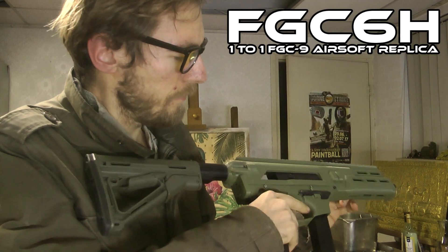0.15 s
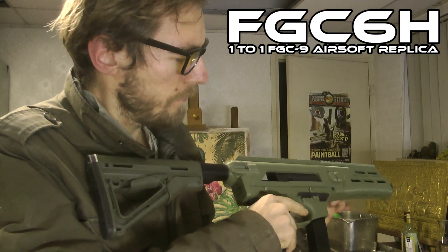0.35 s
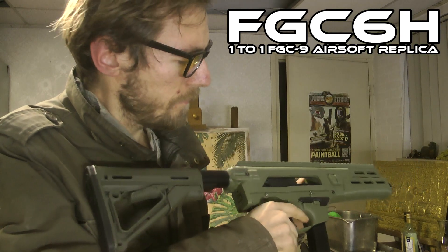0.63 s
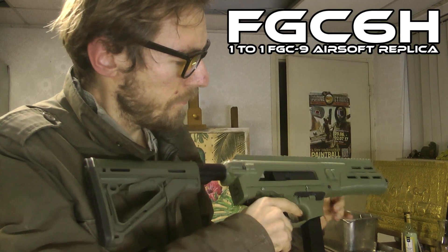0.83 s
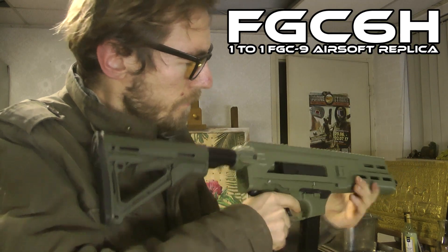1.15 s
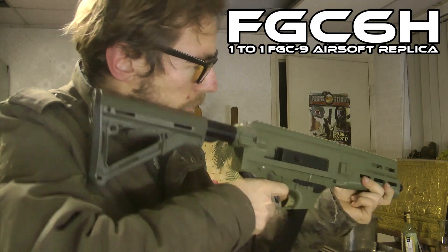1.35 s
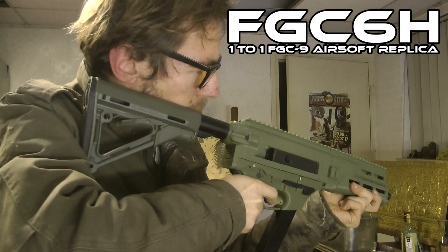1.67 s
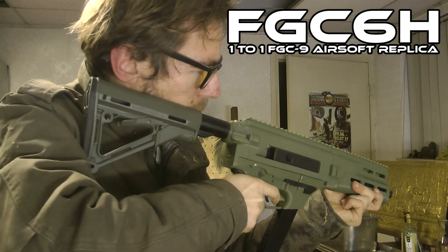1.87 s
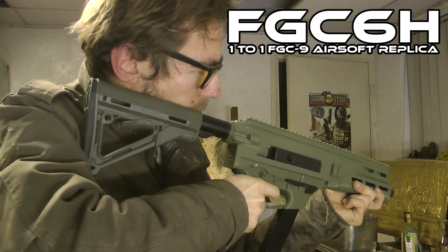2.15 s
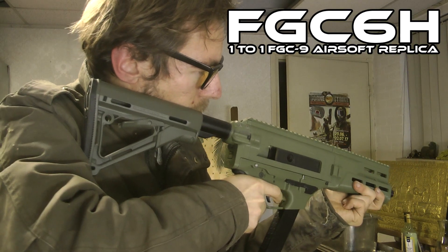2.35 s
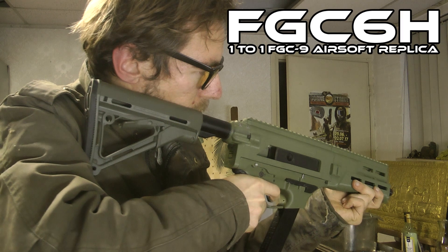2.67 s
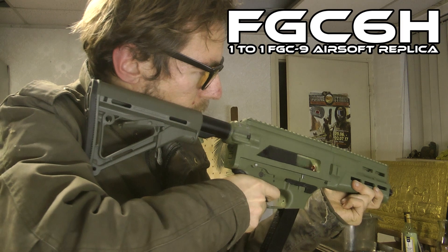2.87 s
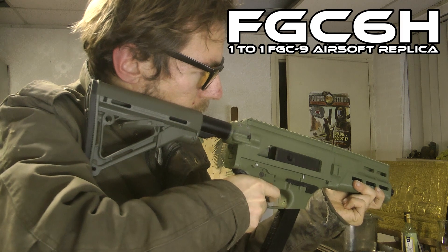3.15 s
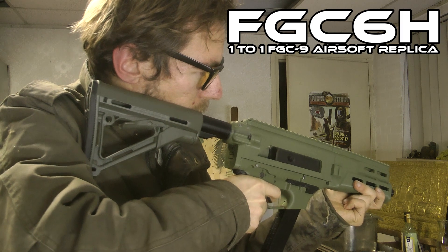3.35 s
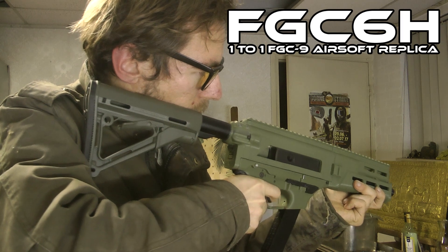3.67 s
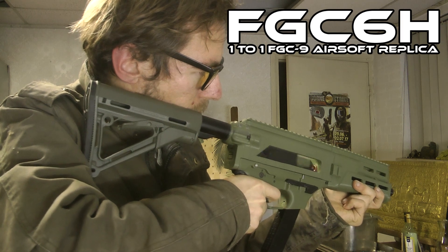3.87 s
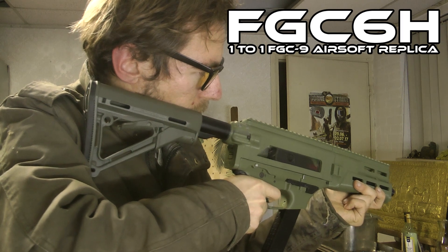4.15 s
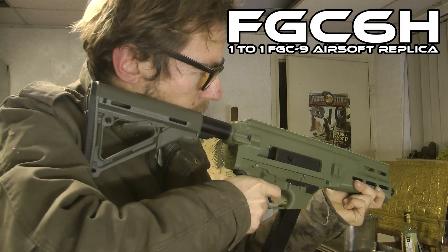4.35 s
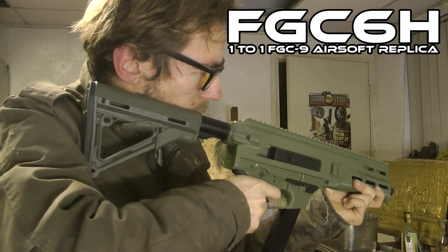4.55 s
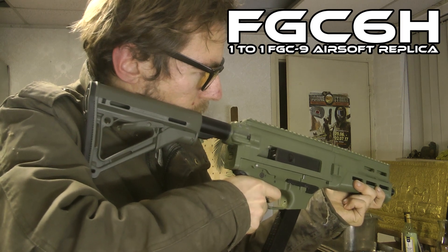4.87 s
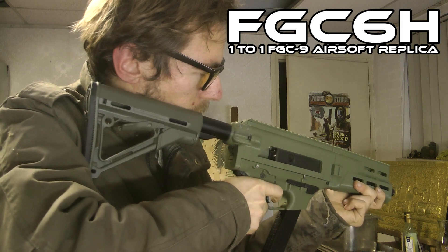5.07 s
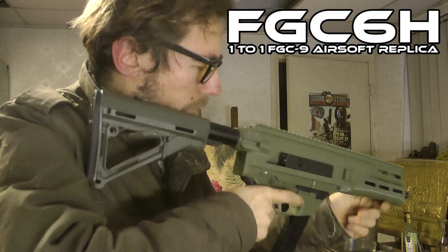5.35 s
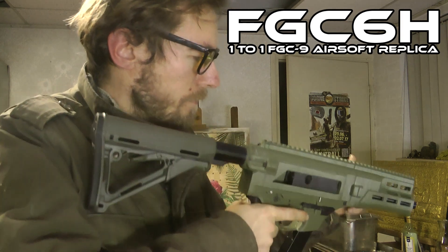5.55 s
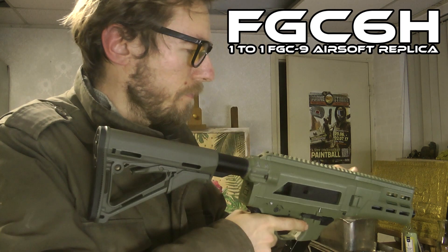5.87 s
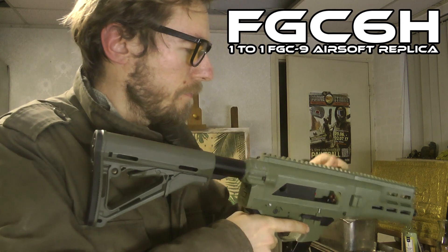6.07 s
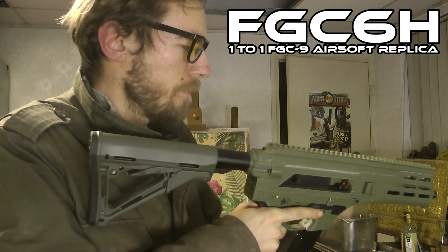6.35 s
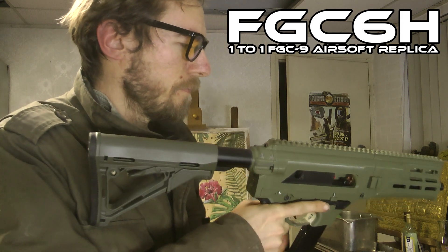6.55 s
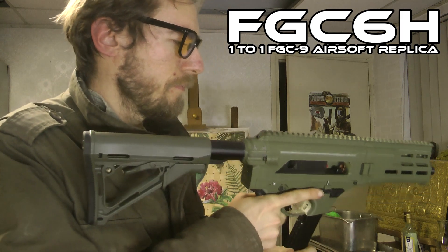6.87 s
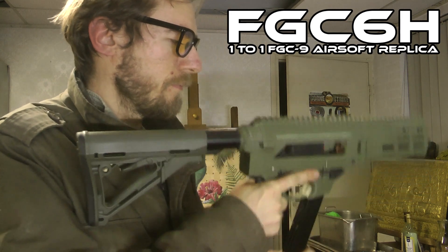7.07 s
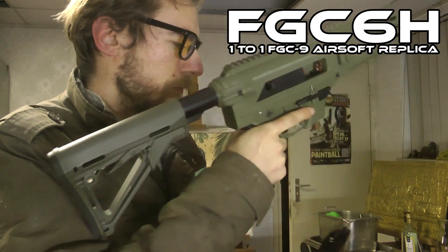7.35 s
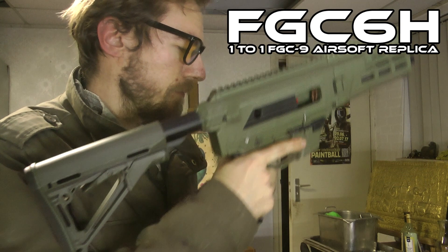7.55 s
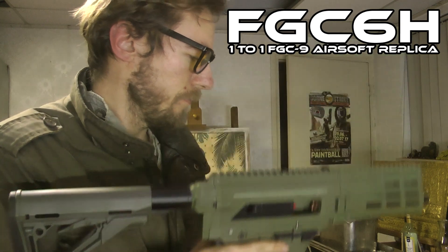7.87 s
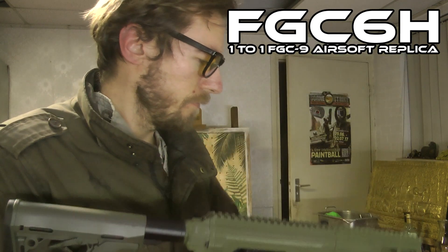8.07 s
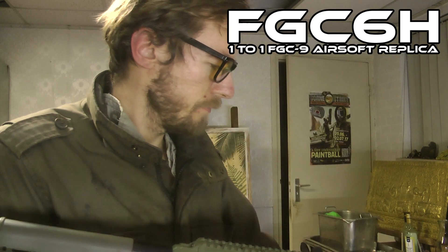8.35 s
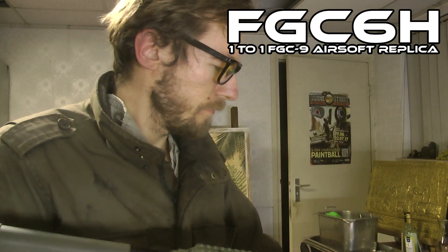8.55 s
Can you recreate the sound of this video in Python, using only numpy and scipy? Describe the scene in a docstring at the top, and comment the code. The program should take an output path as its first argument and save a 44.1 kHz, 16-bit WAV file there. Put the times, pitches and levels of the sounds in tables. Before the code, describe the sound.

Gas airsoft gun is cocked with metallic clacks, fires eight sharp shots and a weak ninth, then is racked and its magazine thuds down.

```python
"""Gas blowback airsoft gun in a small room

Loaded and cocked close to the microphones, it fires eight shots and a weak ninth; then the bolt is racked
and the magazine comes out and lands with a thud. A jacket rustles over room air and a faint hum.
Contacts are noise bursts and friction is gated noise, coloured by the parts that carry them; a convolved
tail adds the room, slow pulses the low thumps at hard blows, and decaying sines the spring.
"""
import sys
import numpy as np
from scipy import signal
from scipy.fft import rfft, irfft, next_fast_len
from scipy.io import wavfile
from scipy.ndimage import uniform_filter1d

SR = 44100
rng = np.random.default_rng(int(sys.argv[2]) if len(sys.argv) > 2 else 0)


def wav_out(sig):
    """Save sig, one row per channel (or a flat mono array), as 16-bit PCM at SR to the path in sys.argv[1]."""
    wavfile.write(sys.argv[1], SR, np.round(np.clip(np.atleast_2d(sig).T, -1, 1) * 32767).astype(np.int16))


N = 384728
TIME = np.arange(N) / SR
MIRROR = np.array([[1], [-1]])   # left, right signs of a side signal

# All levels are relative: later gains, colours and the gain control act on them.


def from_db(db):
    """Amplitude ratio of a level in dB."""
    return 10 ** (np.asarray(db) / 20)


def rms_one(x):
    """Scale to unit rms."""
    return x / np.sqrt(np.mean(x ** 2) + 1e-20)


def at_hz(points, hz):
    """Interpolate (freq_hz, value) points on a log-frequency axis."""
    freq_hz, value = np.transpose(points)
    return np.interp(np.log(np.maximum(hz, 1)), np.log(freq_hz), value)


def convolve(x, response):
    """Convolve and trim to the scene length."""
    return signal.oaconvolve(x, response)[:N]


def body(x, colour, resonances=(), size=8192):
    """A solid part filters x: minimum-phase response of unit energy, broad colour plus resonances."""
    hz = np.arange(size // 2 + 1) * SR / size
    db = at_hz(colour, hz)
    for freq_hz, width_hz, lift_db in resonances:
        db = db + lift_db / (1 + (2 * (hz - freq_hz) / width_hz) ** 2)
    # folded cepstrum gives minimum phase
    cepstrum = irfft(np.log(from_db(db)))[:size // 2]
    cepstrum[1:] *= 2
    response = irfft(np.exp(rfft(cepstrum, size)))
    return convolve(x, response / np.linalg.norm(response))


def contacts(rows, t60_s, gain_db, hold_s=0., delay_s=0., rise_s=0.00017, size=4096):
    """Each contact is a burst of micro-impacts that builds up, holds and dies away."""
    age_s = np.arange(size) / SR
    out = np.zeros(N + 2 * size)
    decay = from_db(-60 * np.maximum(age_s - hold_s, 0) / t60_s)
    shape = np.minimum(age_s / rise_s, 1) * decay
    hz = np.arange(size // 2 + 1) * SR / size
    octaves = np.log2(np.maximum(hz, 1400) / 3500)   # brightness is flat below 1400 Hz
    noises = rng.laplace(size=(len(rows), size))
    for (start_s, level_db, bright_db_per_oct), noise in zip(rows, noises):
        # a short blow excites all pitches alike: keep phase only
        even = np.exp(1j * np.angle(rfft(noise * shape)))
        burst = irfft(even * from_db(bright_db_per_oct * octaves))
        burst = burst * np.minimum(2 * shape, 1) ** .5
        at = int((start_s + delay_s) * SR)
        out[at:at + size] += from_db(level_db + gain_db) * np.linalg.norm(shape) * burst
    return out[:N]


def strokes(rows, release_s):
    """Gain of strokes that swell, hold and die away; attack and release each span 20 dB."""
    db = -120
    for start_s, length_s, level_db, attack_s in rows:
        before = np.maximum(start_s - TIME, 0) / attack_s
        after = np.maximum(TIME - start_s - length_s, 0) / release_s
        db = np.maximum(db, level_db - 20 * (before + after))
    return from_db(db)


def friction(grain_db, grains_per_s, uneven_db=2.5, strokes_per_s=35):
    """Noise whose strength wanders as tiny contacts catch and let go under an uneven pressure."""
    db = 0
    for depth_db, rate in ((grain_db, grains_per_s), (uneven_db, strokes_per_s)):
        db = db + depth_db * np.interp(TIME * rate, np.arange(N), rng.standard_normal(N))
    return rms_one(rng.standard_normal(N) * from_db(db))


def diffuse(length, count=3, size=3072):
    """Rows of well-scattered reflections: noise in which no single pitch stands out."""
    noise = rng.standard_normal((count, length))
    for _ in range(2):
        frames = signal.stft(noise, nperseg=size)[2]
        flat = np.exp(1j * np.angle(frames))
        noise = signal.istft(flat, nperseg=size)[1][:, :length]
    return noise


# room decay: freq_hz, t60_s
ROOM_DECAY = [(100, .22), (500, 0.31), (1400, 0.22), (3700, 0.33), (9700, 0.25), (16000, 0.21)]
# strength of reflections: freq_hz, level_db
REFLECTION_COLOUR = [(100, -5.5), (500, 1), (1200, 1), (3000, 0), (7000, 3), (16000, -0.5)]


def room(x, wet_db, spread_db=-10, build_up_s=0.0032, sway_rad_per_s=4.52, count=7):
    """Direct sound and a dense tail that dies band by band; close microphones hear nearly the same."""
    age_s = TIME[:SR // 2]
    hz = np.arange(len(age_s) // 2 + 1) * SR / len(age_s)
    centres_hz = np.geomspace(150, 15000, count)
    white = rfft(diffuse(len(age_s)))
    tail = 0
    for centre_hz, share in zip(centres_hz, np.eye(count)):
        band = irfft(white * at_hz(np.c_[centres_hz, share], hz), len(age_s))
        decay_db = -60 * age_s / at_hz(ROOM_DECAY, centre_hz)
        tail = tail + band * from_db(at_hz(REFLECTION_COLOUR, centre_hz) + decay_db)
    tail = tail * (1 - np.exp(-(age_s / build_up_s) ** 2))   # reflections take a moment to arrive
    here, there, across = from_db(wet_db) * tail / np.linalg.norm(tail, axis=1, keepdims=True)
    # as the gun sways, the pattern of reflections changes
    sway = sway_rad_per_s * TIME
    mid = convolve(x * np.cos(sway), here) + convolve(x * np.sin(sway), there)
    return x + mid + from_db(spread_db) * convolve(x, across) * MIRROR


# room air: freq_hz, level_db
AIR_SPECTRUM = [(15, -37.5), (25, -16), (263, -11.5), (301, -7), (354, -15.5), (394, -9.5), (624, -23.5),
                (775, -12), (863, -26), (1610, -22), (1740, -14.5), (2110, -19), (8830, -33),
                (14000, -32.5), (16000, -31)]
# room air, side against mid: freq_hz, level_db
AIR_SIDE = [(60, -6.5), (550, -7), (1650, -11.5), (5000, -34.5), (15000, -19)]
AIR_LEVEL_DB = -55.5


def room_air():
    """Steady coloured noise, its two channels less alike at low pitches."""
    mid, side = [from_db(AIR_LEVEL_DB) * body(rng.standard_normal(N), AIR_SPECTRUM) for _ in range(2)]
    size = next_fast_len(N)
    hz = np.arange(size // 2 + 1) * SR / size
    side = irfft(rfft(side, size) * from_db(at_hz(AIR_SIDE, hz)), size)[:N]
    return mid + side * MIRROR


# appliance hum: freq_hz, rms_level_db
HUM_TONES = [(299.6, -62), (762, -71.5)]


def appliance_hum():
    """Steady sines of an appliance in the room."""
    return sum(np.sqrt(2) * from_db(rms_level_db) * np.sin(2 * np.pi * freq_hz * TIME)
               for freq_hz, rms_level_db in HUM_TONES)


# arm moving in its sleeve: start_s, length_s, level_db, attack_s
SLEEVE_MOVES = [(.08, 0.14, -52, .2), (1.32, .17, -40.5, 0.36), (5.4, 0.15, -56.5, 0.24),
                (5.73, 0.04, -52.5, 0.47), (6.56, 0.016, -50.5, .12), (7.88, 0.6, -51, 0.62),
                (8.12, 0.017, -46.5, .06)]
# jacket cloth: freq_hz, level_db
CLOTH_SPECTRUM = [(180, -16.5), (300, -4.5), (354, -6), (398, -10.5), (645, -8), (713, -12), (994, -15.5),
                  (2880, -7), (5080, -10.5), (14500, -25.5), (16000, -36)]
SLEEVE_RELEASE_S = 0.2


def jacket():
    """Cloth rubs on cloth as the arms move: grainy friction noise under slow strokes."""
    rub = strokes(SLEEVE_MOVES, SLEEVE_RELEASE_S) * friction(grain_db=1.0, grains_per_s=220)
    return room(body(rub, CLOTH_SPECTRUM), wet_db=-12.5)


# magazine landings: start_s, level_db
MAGAZINE_LANDINGS = [(8.412, -15.5), (8.635, -36)]
ROCK_S, ROCK_LOSS_DB, LANDING_DB_PER_OCT = .017, 4, -3   # time and loss per touch, brightness


def rocking(count=6):
    """Each landing rocks: a run of ever weaker touches, slightly uneven in time."""
    return [(start_s + ROCK_S * k * rng.uniform(0.88, 1.05), level_db - ROCK_LOSS_DB * k, LANDING_DB_PER_OCT)
            for start_s, level_db in MAGAZINE_LANDINGS for k in range(count)]


# thud: freq_hz, level_db
THUD_SPECTRUM = [(24, -69), (40, -27), (129, -4.5), (351, 0.5), (435, -3.5), (527, -12), (771, -15),
                 (956, -29), (1080, -17), (1190, -30), (1740, -25), (3310, -23.5), (12000, -58),
                 (15600, -85), (22000, -120)]
# hollow ring of the table: freq_hz, width_hz, lift_db
TABLE_MODES = [(226, 22, 1), (274, 30, 1.5), (345, 110, 0), (432, 31, 5.5), (760, 150, 6)]


def landing_thud():
    """The rocking magazine strikes the hollow table, whose low resonances ring."""
    touches = contacts(rocking(), t60_s=0.04, gain_db=0.5)
    return room(body(touches, THUD_SPECTRUM, TABLE_MODES), wet_db=-6.5, spread_db=-6)


# spring zings: start_s, level_db, bright_db_per_oct
SPRING_ZINGS = [(0.893, -13.5, -3.5), (2.478, -26.5, 3.5), (5.119, -27.5, 11), (5.123, -16.5, -3.5),
                (7.778, -39.5, 0.5)]
# scrape of the coils: freq_hz, level_db
ZING_SPECTRUM = [(880, -85), (1500, -43.5), (1670, -20), (1900, -61.5), (2100, -19), (3520, -0.5),
                 (3810, 3.5), (5280, 6), (5710, 3), (11200, -0.5), (16000, -2.5)]
# recoil spring modes: freq_hz, level_db, t60_s
SPRING_MODES = [(3760, -6.5, 0.66), (3700, 1.5, 0.72), (4270, -6.5, 0.54), (4770, 0, .5), (4900, -8, 0.77),
                (4900, -2, 0.46), (5600, -5, 0.38), (6040, -0.5, .4), (6240, -3.5, 0.8),
                (6700, -10.5, 0.44), (10300, -10.5, .25), (11100, -12, .25)]


def spring():
    """A bright scrape of the coils, which then ring on as decaying sines."""
    scrape = contacts(SPRING_ZINGS, t60_s=0.055, gain_db=-3, rise_s=.001)
    age_s = TIME[:SR]
    ring = sum(from_db(level_db - 60 * age_s / t60_s) * np.sin(2 * np.pi * freq_hz * age_s)
               for freq_hz, level_db, t60_s in SPRING_MODES)
    ringing = from_db(-10) * convolve(scrape, ring / np.linalg.norm(ring))
    return ringing + room(body(scrape, ZING_SPECTRUM), wet_db=-2)


# small ticks: level over the arm movement, its spread, brightness
RATTLE_DB, RATTLE_SPREAD_DB, RATTLE_DB_PER_OCT = 6.5, 3, -6.5


def rattles(count=70):
    """Loose fittings tick at random moments, as strongly as the arms are moving."""
    movement_db = 20 * np.log10(strokes(SLEEVE_MOVES, SLEEVE_RELEASE_S))
    moments = rng.integers(0, N, count)
    chances = rng.standard_normal(count)
    return [(at / SR, movement_db[at] + RATTLE_DB + RATTLE_SPREAD_DB * chance, RATTLE_DB_PER_OCT)
            for at, chance in zip(moments, chances)]


# ringing metal catches: start_s, level_db, bright_db_per_oct
CATCH_HITS = [(0.4703, -6.5, 1.5), (0.4765, -15, -2), (0.8422, -8.5, -2), (0.8935, -6, 3.5),
              (5.9592, -2, 1.5)]
# hand-worked parts hit their stops: start_s, level_db, bright_db_per_oct
CLACK_HITS = [(0.5500, -1, -1.5), (0.5575, 4, 1.5), (0.5685, 7, -6), (0.5845, -1, 2), (0.5930, 7.5, 0),
              (0.8690, 0.5, 0), (0.8920, 4.5, 1.5), (6.0140, 4.5, 2.5), (6.0435, 5, -1), (6.0560, -4, 6),
              (6.0630, 4, -2)]
# knocks of magazine and grip, dull to bright: start_s, level_db, bright_db_per_oct
KNOCK_HITS = [(0.438, -33.5, -8.5), (0.464, -21, -4), (0.828, -12.5, -8), (1.495, -21, 1.5),
              (1.562, -27.5, -3.5), (3.760, -6.5, 9.5), (4.728, -22, -5.5), (5.931, -29.5, -7),
              (6.185, -8, -3.5), (6.249, 1, -0.5), (6.539, -32.5, -1.5), (6.780, -38.5, -8),
              (7.081, -21, -0.5), (7.132, -26, 6), (7.153, -23, -5.5), (7.358, -21.5, -3.5),
              (7.374, -25.5, -1), (8.411, -22, -1)]
# metal slides on metal: start_s, length_s, level_db, attack_s
SLIDE_STROKES = [(.505, 0.033, -26, 0.009), (.565, 0.031, -21, .015), (.86, 0.026, -24, 0.051),
                 (6.01, 0.057, -23.5, 0.014), (6.178, .005, -41, 0.025), (6.243, 0.0057, -28.5, 0.014),
                 (7.165, 0.028, -43.5, .03), (7.22, 0.14, -60.5, .02)]
# charging rod squeals as it is drawn: start_s, length_s, level_db, attack_s
SQUEAL_STROKES = [(.516, 0.031, -25.5, 0.0055), (.86, .02, -40, .007)]
# spectra: freq_hz, level_db
CATCH_SPECTRUM = [(40, -29), (400, -20.5), (1000, -23), (1800, -4.5), (3800, -2), (5800, -8), (7000, -13.5),
                  (11000, -18.5), (16000, -32)]
CLACK_SPECTRUM = [(35, -27.5), (60, -15.5), (164, -25), (492, -26), (946, -50), (1410, -3.5), (1550, -24.5),
                  (1740, -1.5), (3190, -3.5), (3500, -1.5), (7060, -5.5), (14200, -14.5), (16000, -20.5)]
KNOCK_SPECTRUM = [(71, -77), (120, -33), (362, -12.5), (1070, -14.5), (1290, -10.5), (2340, -4),
                  (3820, -7.5), (4230, -1.5), (5190, -7.5), (6500, -12), (12000, -28.5), (14700, -31.5),
                  (16000, -38)]
SLIDE_SPECTRUM = [(120, -77.5), (200, -22), (548, -19.5), (777, -11.5), (1230, -11), (1740, -6.5),
                  (2960, -3), (3690, -7.5), (4350, -4.5), (9060, -15), (16000, -23)]
SQUEAL_SPECTRUM = [(300, -24.5), (800, -1.5), (3800, 4), (9000, -19.5)]
# resonances of steel, magazine, trigger lever and rod: freq_hz, width_hz, lift_db
STEEL_MODES = [(813, 170, 21), (1174, 76, 8), (1670, 83, 8), (1870, 110, 3), (2680, 110, 6.5),
               (3640, 200, 5.5), (4200, 85, 11), (4940, 150, 6.5), (5820, 330, 9.5)]
MAGAZINE_MODES = [(416, 21, 10), (798, 74, 5.5), (950, 160, -7.5), (1078, 62, 9.5), (1710, 56, 7),
                  (1977, 63, 1.5), (2444, 34, -2.5), (2580, 99, 2.5)]
LEVER_MODES = [(2050, 750, 6.5), (3730, 200, 2.3), (5970, 770, 2.55)]
ROD_MODES = [(818, 68, 26.5), (3830, 250, 23)]
SLIDE_RELEASE_S, SQUEAL_RELEASE_S = 0.029, .005


def handling():
    """Catches ring, parts slide, squeal and clack into place, magazine and grip knock."""
    catches = contacts(CATCH_HITS, t60_s=0.029, gain_db=2.5, hold_s=0.0019)
    catches = body(catches, CATCH_SPECTRUM, STEEL_MODES)
    clacks = body(contacts(CLACK_HITS, t60_s=0.018, gain_db=-3), CLACK_SPECTRUM, MAGAZINE_MODES)
    knocks = contacts(KNOCK_HITS + rattles(), t60_s=0.034, gain_db=-7, rise_s=0.00063)
    knocks = body(knocks, KNOCK_SPECTRUM, MAGAZINE_MODES + LEVER_MODES)
    rub = strokes(SLIDE_STROKES, SLIDE_RELEASE_S) * friction(grain_db=1.5, grains_per_s=790)
    slide = body(from_db(9.0) * rub, SLIDE_SPECTRUM, MAGAZINE_MODES)
    draw = strokes(SQUEAL_STROKES, SQUEAL_RELEASE_S) * rng.standard_normal(N)
    squeal = body(from_db(3.5) * draw, SQUEAL_SPECTRUM, ROD_MODES)
    return room(catches + knocks + squeal, wet_db=-3.5) + room(clacks + slide, wet_db=-4.5)


# valve opens, weaker as the gas cools: start_s, strength_db, trigger_lead_s, bolt_travel_s, thump_db
SHOT_CYCLES = [(2.0896, 0, 0.035, 0.074, -13.5), (2.6039, 0, .0339, 0.071, -22.5),
               (2.9597, -2, .0334, 0.07, -25), (3.309, -3, 0.037, 0.07, -16.5),
               (3.6314, -3.5, 0.045, 0.072, -24.5), (3.9632, -3, 0.034, 0.071, -21.5),
               (4.2715, -3.5, .0334, .0717, -25), (4.5809, -4.5, 0.033, 0.068, -28)]
# low thumps at other hard blows: start_s, level_db
OTHER_THUMPS = [(0.894, -25.5), (4.881, -35.5), (5.961, -22), (6.045, -15)]
THUMP_DELAY_S = 0.0032    # after the valve opens
RETURN_THUMP_DB = -14.5   # weaker at the bolt's return


def thump_times():
    """Start and level of the thump at every blast, every bolt return and a few other hard blows."""
    blasts = [(start_s + THUMP_DELAY_S, thump_db) for start_s, _, _, _, thump_db in SHOT_CYCLES]
    returns = [(start_s + travel_s, thump_db + RETURN_THUMP_DB)
               for start_s, _, _, travel_s, thump_db in SHOT_CYCLES]
    return blasts + returns + OTHER_THUMPS


def thumps(width_s=0.0014, gain_db=5, side_db=2, side_lag_s=.002):
    """A low pulse of random sign per hard blow, then a later one, opposite in the two channels."""
    age = TIME[:SR // 20] / width_s
    out = np.zeros((2, N))
    rows = thump_times()
    signs = rng.choice([-1, 1], (len(rows), 2))
    for (start_s, level_db), (mid_sign, side_sign) in zip(rows, signs):
        out[:, int(start_s * SR)] += from_db(level_db + gain_db) * mid_sign
        side_pulse = from_db(level_db + side_db) * side_sign
        out[:, int((start_s + side_lag_s) * SR)] += side_pulse * MIRROR[:, 0]
    pulse = (age * np.exp(1 - age)) ** 2
    return np.array([convolve(channel, pulse) for channel in out])


# trigger clicks outside the full shots: start_s, level_db, bright_db_per_oct
EXTRA_CLICKS = [(2.474, -28, -3), (4.8100, -21, -1.5), (5.0897, -31, -1)]
# parts of a shot: level_db at full strength, db_per_strength_db, bright_db_per_oct
TRIGGER_PART, HAMMER_PART = (-21.5, 1.6, -6.5), (-6.5, 1.5, 0.22)
BLAST_PART, BOLT_PART = (-.6, 1, 0.6), (-2.85, 1.15, 0.4)
# ninth shot, short of gas, has no blast: start_s, level_db, bright_db_per_oct
LAST_HAMMER, LAST_BOLT = (4.8586, -15, -.8), (4.8794, -10.5, 3)
HAMMER_LEAD_S = .0238   # before the valve opens


def firing_cycle():
    """Contacts of trigger, hammer, blast and bolt, each following the strength of its shot."""
    start_s, strength_db, lead_s, travel_s, _ = np.transpose(SHOT_CYCLES)

    def part(times_s, settings):
        """One contact per shot for one part of the gun."""
        level_db, follows, bright_db_per_oct = settings
        return [(at_s, level_db + follows * strength, bright_db_per_oct)
                for at_s, strength in zip(times_s, strength_db)]

    pulls = part(start_s - lead_s, TRIGGER_PART) + EXTRA_CLICKS
    falls = part(start_s - HAMMER_LEAD_S, HAMMER_PART) + [LAST_HAMMER]
    blasts = part(start_s, BLAST_PART)
    returns = part(start_s + travel_s, BOLT_PART) + [LAST_BOLT]
    return pulls, falls, blasts, returns


# spectra: freq_hz, level_db
TRIGGER_SPECTRUM = [(290, -51), (500, -20.5), (1050, -18.5), (1900, -6.5), (2810, -0.5), (7420, 7),
                    (14700, -10), (16000, -50)]
HAMMER_SPECTRUM = [(40, -45), (300, -18.5), (900, -21.5), (1400, -2), (2300, -3), (3200, -13), (5000, -8),
                   (8000, -17.5), (16000, -27.5)]
BLAST_SPECTRUM = [(40, -33.5), (200, -8), (300, -3), (500, -12), (950, -16.5), (1400, 1), (2500, -2),
                  (5500, -1.5), (8000, -8.5), (12000, -14.5), (16000, -16.5)]
BOLT_SPECTRUM = [(40, -13.5), (200, -22.5), (950, -17), (1400, -2), (2200, 0), (5500, -3), (9000, -6.5),
                 (12500, -10.5), (16000, -13)]
# resonances of the hammer's knock and of the receiver: freq_hz, width_hz, lift_db
STRIKER_MODES = [(1116, 47, 1), (1400, 71, 9.5), (1490, 86, -2), (1680, 89, 5), (2350, 200, 7)]
RECEIVER_MODES = [(368, 14, -3), (438.8, 13, 7.5), (791, 140, 10.5), (1096, 49, 13), (1134, 71, -3.5),
                  (1290, 78, -7.5), (1418, 110, 7.5), (1551, 45, -29), (1560, 24, 1.5), (2110, 24, 3),
                  (2330, 91, 3.5), (3438, 30, 7.5), (4380, 21, 5), (4850, 48, 3.5)]


def shots():
    """Trigger, hammer, valve knock, a swell of gas, the bolt cracking back on its stop and returning."""
    pulls, falls, blasts, returns = firing_cycle()
    trigger = contacts(pulls, t60_s=0.038, gain_db=3.0, rise_s=0.00094)
    hammer = contacts(falls, t60_s=0.055, gain_db=-7.0, hold_s=0.0041, rise_s=0.0015)
    valve = contacts(falls, t60_s=.012, gain_db=-8, delay_s=.016)
    gas = contacts(blasts, t60_s=0.04, gain_db=0, hold_s=0.0085, delay_s=-.003, rise_s=0.0076)
    crack = contacts(blasts, t60_s=0.0029, gain_db=9.5, delay_s=.004)
    back_stop = contacts(blasts, t60_s=0.0035, gain_db=10.5, delay_s=.008)
    run_home = contacts(returns, t60_s=0.013, gain_db=-22.5, hold_s=0.045, delay_s=-0.018, rise_s=0.0049)
    slam = contacts(returns, t60_s=0.012, gain_db=6, delay_s=.0005)
    chatter = contacts(returns, t60_s=0.032, gain_db=-7, hold_s=0.0017, delay_s=.001, rise_s=0.00059)
    # each part of the gun reaches the walls by paths of its own
    return (room(body(trigger, TRIGGER_SPECTRUM, LEVER_MODES), wet_db=1)
            + room(body(hammer + valve, HAMMER_SPECTRUM, STRIKER_MODES), wet_db=-3.5)
            + room(body(gas, BLAST_SPECTRUM, RECEIVER_MODES), wet_db=-3)
            + room(body(crack + back_stop, BLAST_SPECTRUM, RECEIVER_MODES), wet_db=-9.5)
            + room(body(run_home + slam + chatter, BOLT_SPECTRUM, RECEIVER_MODES), wet_db=-1.5))


def scene():
    """Sum of all sources, the whole a little to the right."""
    background = room_air() + appliance_hum() + jacket()
    gun = landing_thud() + spring() + handling() + thumps() + shots()
    return (background + gun) * from_db([[-.6], [.6]])


CUTOFF_HZ = 15900


def record(dry, threshold_db=-22, slope=.45, release_db_per_s=11):
    """Gain control ducks at loud blows and recovers slowly; peaks are rounded, the top is cut."""
    power = uniform_filter1d(np.mean(dry ** 2, axis=0), size=88)   # 2 ms window
    loudness_db = 10 * np.log10(np.maximum(power, 1e-12))
    excess_db = slope * np.maximum(loudness_db - threshold_db, 0)
    recovery_db = release_db_per_s * TIME
    duck_db = np.maximum.accumulate(excess_db + recovery_db) - recovery_db
    rounded = np.tanh(dry * from_db(-duck_db))
    low_pass = signal.ellip(10, .1, 80, CUTOFF_HZ, fs=SR, output="sos")
    return signal.sosfilt(low_pass, rounded)


dry = scene()
out = record(dry)
wav_out(out)
```